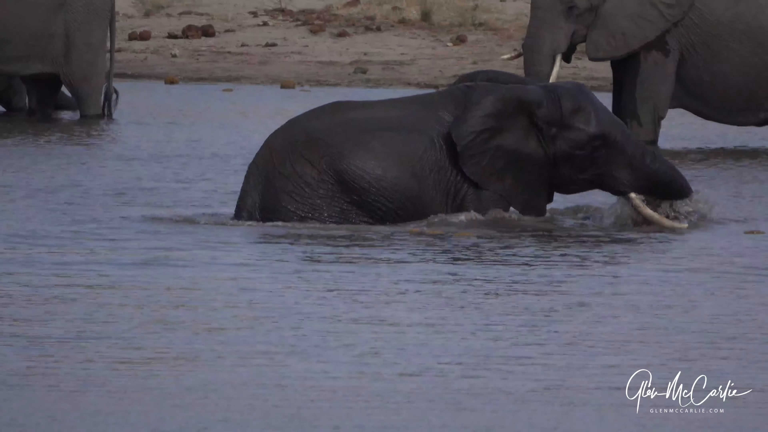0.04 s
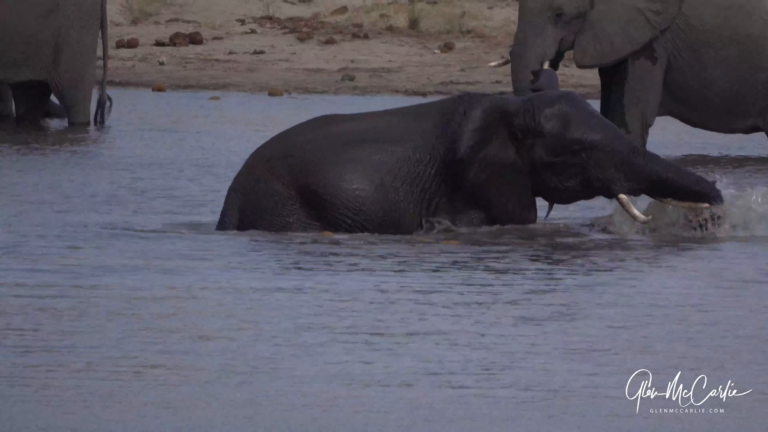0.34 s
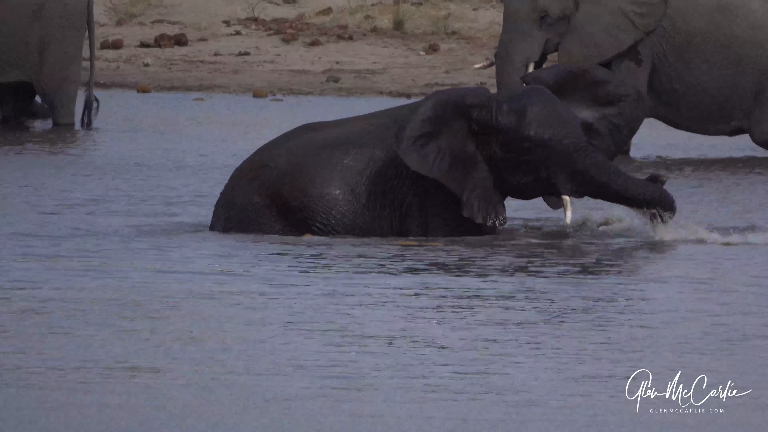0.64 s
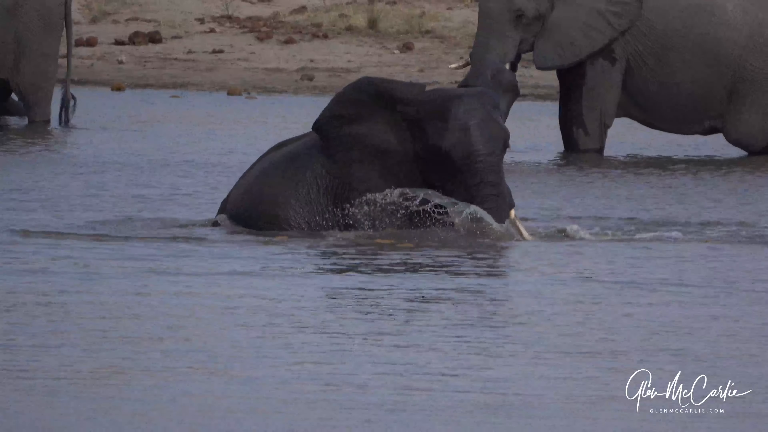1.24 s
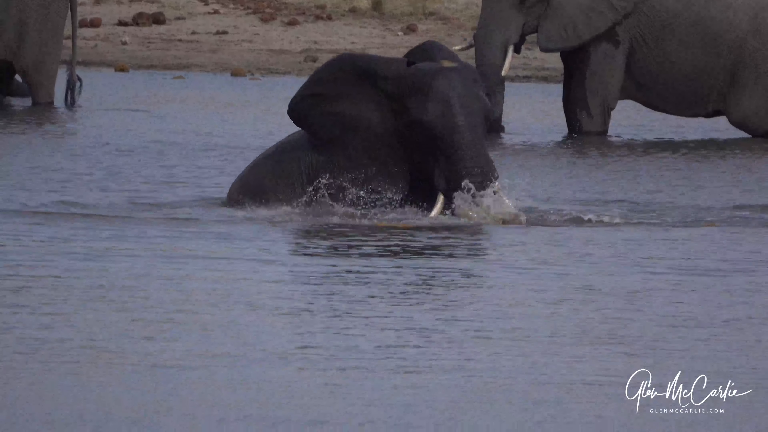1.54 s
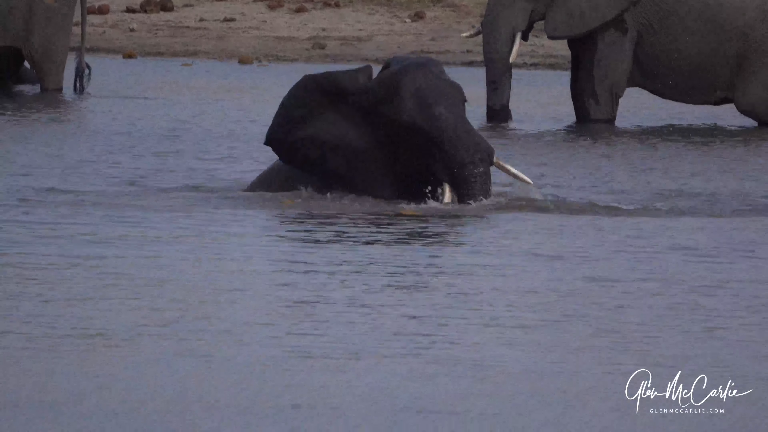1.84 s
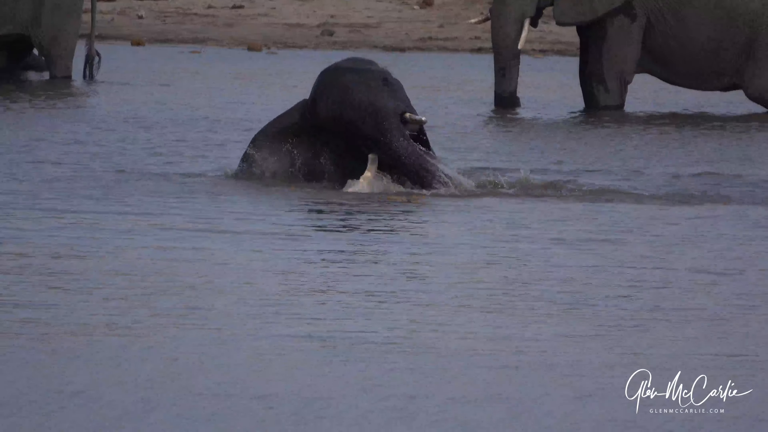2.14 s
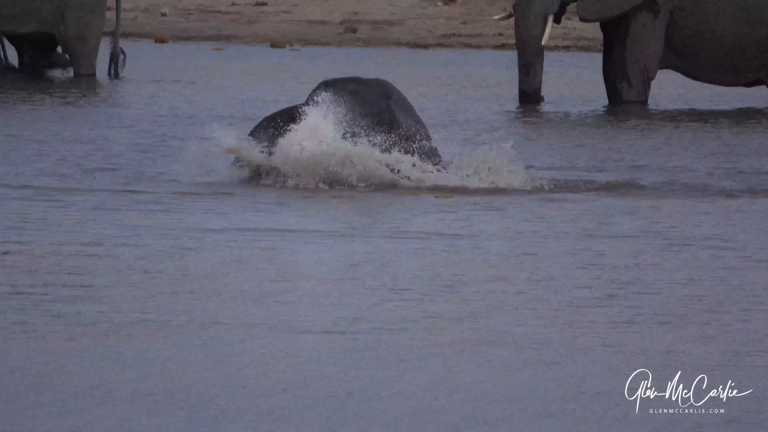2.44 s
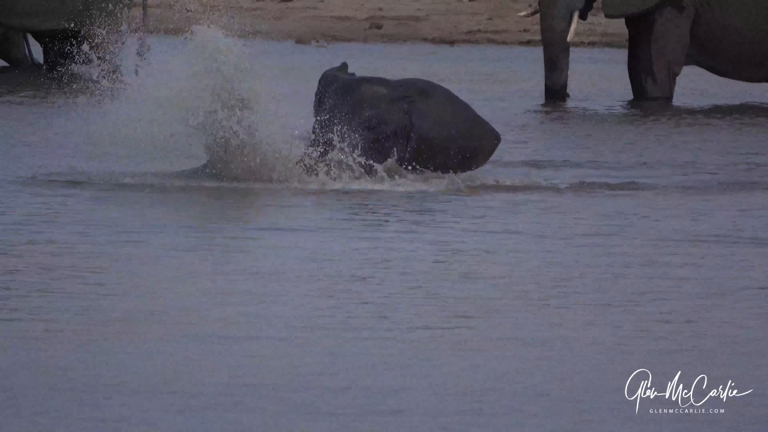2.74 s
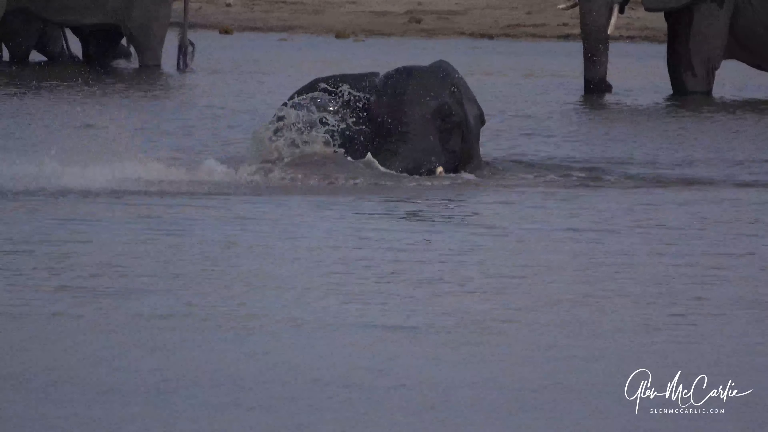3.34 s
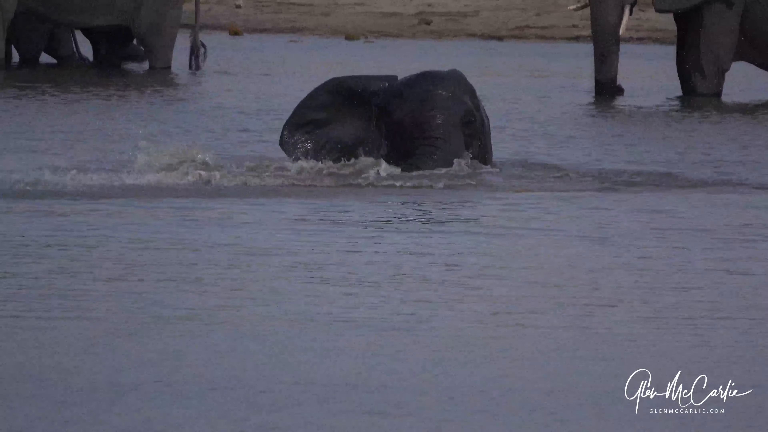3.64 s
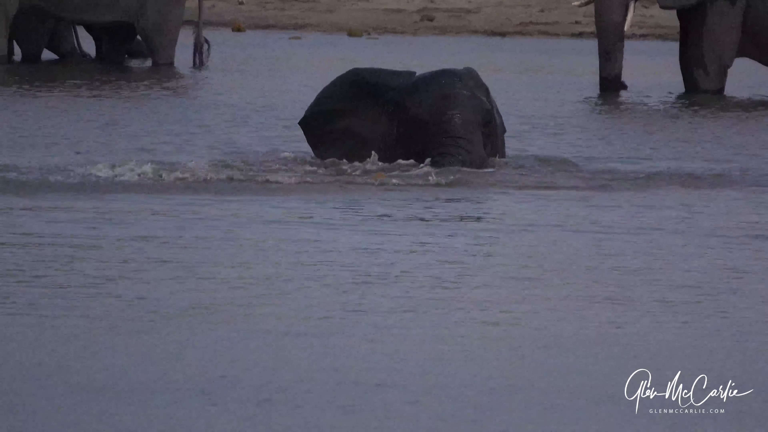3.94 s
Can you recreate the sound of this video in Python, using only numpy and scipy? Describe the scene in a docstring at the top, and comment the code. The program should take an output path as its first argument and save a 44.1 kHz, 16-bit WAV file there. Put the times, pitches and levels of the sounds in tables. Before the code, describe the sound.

Water sloshes and splashes as an elephant wallows in a waterhole.

```python
"""A waterhole, with an elephant wallowing some way off. Water churns round its body; its trunk and head
slap the surface, air pockets gulp as it plunges, and thrown spray rains back. Impacts give bursts of
noise, and trapped air rings as bubbles, the larger the lower. A small bird chatters in quick buzzy
phrases from a bush. Light wind rumbles under a faint hiss."""
import sys
import numpy as np
from scipy import signal
from scipy.fft import rfft, irfft, next_fast_len
from scipy.io import wavfile
from scipy.ndimage import uniform_filter1d, map_coordinates

SR = 44100
rng = np.random.default_rng(int(sys.argv[2]) if len(sys.argv) > 2 else 0)


def wav_out(sig):
    """Save sig, one row per channel (or a flat mono array), as 16-bit PCM at SR to the path in sys.argv[1]."""
    wavfile.write(sys.argv[1], SR, np.round(np.clip(np.atleast_2d(sig).T, -1, 1) * 32767).astype(np.int16))


N = 176400


def amp(db):
    """Amplitude ratio of a level in decibels."""
    return 10 ** (np.asarray(db) / 20)


def unit(x):
    """Normalisation to rms 1."""
    return x / np.sqrt(np.mean(x ** 2) + 1e-20)


def decay(t, t60):
    """Exponential damping: 60 dB down when t reaches t60."""
    return np.exp(-np.log(1000) * t / t60)


def along(points, hz):
    """Interpolation of (frequency_hz, value) points on a logarithmic frequency axis."""
    frequencies, values = np.transpose(points)
    return np.interp(np.log(hz + 1), np.log(frequencies + 1), values)


def curve(rows):
    """Linear interpolation of (time_s, value) points, one value a sample."""
    return np.interp(np.arange(N) / SR, *np.transpose(rows))


def wobble(rate):
    """Smooth random modulation: a spline through rate knots a second."""
    return map_coordinates(rng.standard_normal(1024), [np.arange(N) * rate / SR], mode="wrap")


def add(track, start_s, sound):
    """Superposition of a sound on a track."""
    i = max(0, round(start_s * SR))
    track[i:i + len(sound)] += sound[:max(0, N - i)]


def filtered(x, response):
    """Linear filtering: the spectrum is multiplied by a frequency response."""
    size = next_fast_len(N + SR // 2)
    return irfft(rfft(x, size) * response(np.fft.rfftfreq(size, 1 / SR)), size)[..., :N]


def coloured(x, colour):
    """Minimum-phase filtering to a spectral shape, at rms 1."""
    size = 8192
    cepstrum = irfft(np.log(amp(along(colour, np.fft.rfftfreq(size, 1 / SR)))))
    causal_fold = np.r_[1, np.full(size // 2 - 1, 2), 1, np.zeros(size // 2 - 1)]
    impulse_response = irfft(np.exp(rfft(cepstrum * causal_fold)))
    return unit(signal.fftconvolve(x, impulse_response)[:N])


def rush(colour, patchy_db):
    """Noise modulated in random patches of time and frequency."""
    spectra = signal.stft(rng.standard_normal(N), nperseg=512)[2]
    patches = uniform_filter1d(rng.standard_normal(spectra.shape), size=5, axis=0)
    patches = unit(uniform_filter1d(patches, size=6, axis=1))
    return coloured(signal.istft(spectra * amp(patchy_db * patches))[1][:N], colour)


def impacts(colour, rate, scatter_db):
    """Shot noise: drops of many sizes land at random, rate a second."""
    lands = rng.random(N) < rate / SR
    signs = rng.choice([-1, 1], N)
    sizes = amp(scatter_db * np.clip(rng.standard_normal(N), -2, 2))
    return coloured(lands * signs * sizes, colour)


def bubble(hz, cycles, rise):
    """Damped resonance of trapped air: it starts softly and rises in pitch as it dies."""
    life_s = cycles / hz
    age = np.arange(int(life_s * SR) + 2) / (life_s * SR)
    ring = np.sin(2 * np.pi * cycles * (age + rise * age * age / 2))
    onset = 1 - np.exp(-(cycles * age) ** 2)
    return ring * decay(age, 1) * onset


def bubbles(rate, centre_hz, spread, cycles, scatter_db):
    """Incoherent sum of bubble resonances, rate a second, at rms 1."""
    cloud = np.zeros(N)
    starts_s = rng.random(8000) * N / SR
    draws = np.clip(rng.standard_normal((8000, 3)), -2, 2)
    for start_s, (pitch, life, size) in zip(starts_s[:int(rate * N / SR)], draws):
        ring = bubble(centre_hz * np.exp(spread * pitch), cycles * np.exp(life / 2), rise=0.36)
        add(cloud, start_s, amp(scatter_db * size) * ring)
    return unit(cloud)


def tail(t60_s):
    """Diffuse reverberation: an impulse response of decaying noise, with energy 1."""
    t = np.arange(SR // 2) / SR
    response = rng.standard_normal(len(t)) * decay(t, t60_s)
    return response / np.linalg.norm(response)


def widened(mid, side, coherence):
    """Mid-side stereo: the lower the coherence, the more side signal parts left from right."""
    def weights(hz):
        angle = np.arccos(np.clip(along(coherence, hz), 0, 1)) / 2
        return np.array([np.cos(angle), np.sin(angle)])
    mid, side = filtered(np.array([mid, side]), weights)
    return np.array([mid + side, mid - side])


def air():
    """Steady outdoor hush: a diffuse noise field, most coherent in the bass."""
    # spectrum of the hush: frequency_hz, relative_db
    colour = [(25, -20), (60, 1), (92, -8), (118, 13), (150, 6.5), (300, -2), (540, 31), (660, 27),
              (1100, 26), (2300, 18.5), (2700, 17.5), (3050, 13), (3600, 16.5), (5500, 9), (8000, 6.5),
              (12000, 7), (15500, 5.5)]
    # likeness of left and right: frequency_hz, coherence
    coherence = [(100, 1), (1000, 0.42), (4000, 0.17), (8000, 0.38), (15000, 0.65)]
    mid, side = [coloured(noise, colour) for noise in rng.standard_normal((2, N))]
    return amp(-64) * widened(mid, side, coherence)


def wind():
    """Light gusts modulate the amplitude of a low rumble."""
    # spectrum of the rumble: frequency_hz, relative_db
    colour = [(20, 7), (45, -6), (90, -25)]
    return amp(-112 + 6 * wobble(8.7)) * coloured(rng.standard_normal(N), colour)


def far_hiss():
    """Narrow-band noise: a faint distant hiss that dies away."""
    # envelope of the hiss: time_s, level_db
    levels = [(0, -69.5), (1.0, -73), (1.7, -72), (2.0, -96)]
    # its spectrum: frequency_hz, relative_db
    colour = [(1200, -26), (1900, -5.5), (2200, 8), (2400, 8), (2650, -29), (3500, -33)]
    return amp(curve(levels)) * coloured(rng.standard_normal(N), colour)


def note(length_s, centre_hz, fall_hz):
    """Linear frequency sweep: one falling whistle under a half-sine envelope."""
    age = np.linspace(0, 1, int(length_s * SR))
    pitch_hz = centre_hz + fall_hz * (.5 - age)
    return np.sin(np.pi * age) * np.sin(2 * np.pi * np.cumsum(pitch_hz) / SR)


def bird():
    """Rapid chirps fuse into a buzz: three ticks, a swelling trill and a last tick, blurred by a bush."""
    # phrases of the song: start_s, level_db
    phrases = [(1.434, -61.5), (1.535, -57.5), (1.637, -55), (1.739, -52), (1.838, -53.5), (1.941, -54.5),
               (2.045, -62), (2.145, -65.5), (2.25, -57), (2.352, -55.5), (2.399, -62), (2.452, -57.5),
               (2.554, -62), (2.664, -59.5), (2.765, -58), (2.88, -55.5)]
    pitch_hz, fall_hz = 3690, 760
    tick_s, tick_step_s = .0032, .0047
    note_s, note_step_s, jitter_s = .0052, .0084, .0006
    # parts of a phrase: delay_s, length_s, relative_db
    ticks = [(k * tick_step_s, tick_s, -2.5) for k in range(3)]
    trill = [(.0225 + k * note_step_s, note_s, 2.2 * min(k - 3, 0)) for k in range(6)]
    closing = [(trill[-1][0] + note_step_s, tick_s, -0.5)]
    song = np.zeros(N)
    for start_s, level_db in phrases:
        for delay_s, length_s, relative_db in ticks + trill + closing:
            detune, size, late = rng.standard_normal(3)
            chirp = note(length_s, pitch_hz * (1 + .012 * detune), fall_hz * length_s / note_s)
            blurred = amp(-8) * signal.fftconvolve(chirp, tail(t60_s=.03)[:SR // 20])
            blurred[:len(chirp)] += chirp
            gain = amp(level_db + relative_db + 0.93 * size)
            add(song, start_s + delay_s + jitter_s * late, gain * blurred)
    return song + amp(-11.5) * signal.fftconvolve(song, tail(t60_s=1))[:N]


def spray():
    """Impact noise and bubble resonance: mist and droplets rain back; foam fizzes as the last land."""
    # envelope of the falling spray: time_s, level_db
    levels = [(0, -86), (.15, -87), (.4, -71.5), (.52, -65.5), (.7, -62.5), (.76, -58), (.86, -58),
              (.9, -59.5), (1.07, -60), (1.16, -68.5), (1.3, -73), (1.5, -71.5), (1.6, -74), (2.02, -70.5),
              (2.17, -76), (2.44, -65), (2.56, -72), (2.68, -74), (2.71, -65.5), (2.95, -62.5),
              (3.03, -65.5), (3.25, -63), (3.45, -58), (3.72, -54.5), (4, -63.5)]
    # its spectrum: frequency_hz, relative_db
    colour = [(500, -59), (2000, -4.5), (2500, 0.5), (3000, -5.5), (3600, 3.5), (4000, -3), (4350, 5),
              (4650, -1), (4950, 1.5), (5200, -4), (5700, -1), (6200, -7), (7200, -10.5), (7900, -20),
              (9500, -21), (11000, -40), (15500, -40)]
    # envelope of the foam's fizz: time_s, level_db
    fizz_levels = [(3.2, -100), (3.55, -78), (3.8, -70), (4, -76)]
    # its spectrum: frequency_hz, relative_db
    fizz_colour = [(4000, -30), (9000, 5), (13500, -7), (15500, -0.5)]
    mist = amp(-1) * rush(colour, patchy_db=3)
    droplets = amp(-3.5) * impacts(colour, rate=980, scatter_db=3.5)
    pings = amp(-12.5) * bubbles(rate=220, centre_hz=4400, spread=.19, cycles=52, scatter_db=9)
    fizz = amp(curve(fizz_levels)) * impacts(fizz_colour, rate=13000, scatter_db=4)
    return amp(curve(levels)) * (mist + droplets + pings) + fizz


def drips():
    """Each drip excites a small bubble resonance inside a tiny spatter of narrow-band noise."""
    # small sharp drips: start_s, level_db, pitch_hz, ping_relative_db
    drops = [(0.855, -44, 3870, -2), (1.368, -51, 4430, -5), (1.487, -50, 4060, -3), (1.513, -55, 5420, 6),
             (2.031, -54, 4600, -4), (3.763, -47, 4990, 2)]
    out, t = np.zeros(N), np.arange(SR // 20) / SR
    for start_s, level_db, pitch_hz, ping_relative_db in drops:
        add(out, start_s, amp(level_db + ping_relative_db) * bubble(pitch_hz, cycles=80, rise=0.12))
        roughness = unit(uniform_filter1d(rng.standard_normal(len(t)), size=24))
        spatter = np.exp(-t / 0.015) * roughness * np.sin(2 * np.pi * pitch_hz * t)
        add(out, start_s, amp(level_db - 8) * spatter)
    return out


def plops():
    """Free oscillation of single large bubbles, ringing out above the wash."""
    # large bubbles: start_s, level_db, pitch_hz
    large_bubbles = [(0.522, -40, 957), (0.584, -43.5, 734), (0.80, -45, 1000), (1.873, -47, 653),
                     (2.532, -43, 804), (2.543, -47, 834), (2.555, -48, 790), (3.022, -57.5, 248),
                     (3.099, -44.5, 580), (3.337, -56.5, 175), (3.399, -44, 806), (3.484, -43, 508),
                     (3.549, -38, 648)]
    out = np.zeros(N)
    for start_s, level_db, pitch_hz in large_bubbles:
        add(out, start_s, amp(level_db) * bubble(pitch_hz, cycles=40, rise=0.31))
    return out


def gulps():
    """Large air volumes resonate low: pockets collapse into clusters of deep bubbles."""
    # gulps as the body goes under: start_s, level_db, t60_s
    plunges = [(0.68, -80, 0.99), (2.80, -67, 0.67), (2.915, -57, 0.64), (3.005, -56, 0.34),
               (3.275, -49.5, 0.29), (3.315, -51.5, 0.42), (3.52, -52, 0.2), (3.68, -67, 0.78)]
    # spectrum of their noise: frequency_hz, relative_db
    colour = [(50, -20), (110, -22), (175, -7), (220, -3.5), (275, 2.5), (330, -4), (400, -5), (500, -22),
              (1000, -75)]
    rise_s = .022
    swell, t = np.zeros(N), np.arange(SR) / SR
    for start_s, level_db, t60_s in plunges:
        add(swell, start_s, amp(level_db) * (1 - np.exp(-t / rise_s)) * decay(t, t60_s))
    pockets = bubbles(rate=250, centre_hz=222, spread=.27, cycles=12, scatter_db=1.5)
    return swell * (rush(colour, patchy_db=1.0) + pockets / 2) / 2


def slaps():
    """Impact on water: trunk and head trap air that pops, and raise a burst of lumpy splatter."""
    # blows on the surface: start_s, splatter_db, pop_db, pop_pitch_hz, splatter_t60_s
    blows = [(0.008, -55, -36, 1110, 0.058), (0.206, -53.5, -38, 1210, 0.18),
             (0.219, -58, -43, 1600, 0.072), (0.498, -44, -27.5, 1140, 0.096), (0.516, -54, -45, 1190, .06),
             (0.529, -51, -27.5, 975, 0.09), (0.773, -39.5, -46, 1200, 0.037),
             (0.969, -59, -32.5, 1170, 0.11), (1.365, -56, -47, 1170, 0.18), (1.688, -57, -46, 910, .06),
             (1.805, -54, -34, 693, 0.036), (2.531, -57, -45, 1100, 0.059), (2.693, -50, -41, 1250, .04),
             (2.704, -47, -38, 1170, .12), (2.715, -62, -25.5, 1120, .2), (2.799, -44, -21.5, 1620, 0.027),
             (2.81, -60, -27, 1440, 0.043), (2.932, -44.5, -43, 1220, 0.094), (3.284, -51, -50, 1280, 0.11),
             (3.476, -40.5, -27, 1310, 0.03), (3.541, -46.5, -30, 1560, 0.035), (3.56, -88, -31, 1150, .03),
             (3.595, -47, -42, 1070, 0.2), (3.702, -78, -38, 1280, 0.45), (3.779, -53, -29, 1100, 0.15),
             (3.948, -58, -31, 1100, 0.026)]
    # spectrum of the splatter: frequency_hz, relative_db
    colour = [(100, -55), (350, -13), (550, -12.5), (800, 2.5), (1140, -8), (1420, 3.5), (1680, 1),
              (2050, -6.5), (2400, -5), (2850, -24.5), (4200, -17), (6000, -30), (9000, -41)]
    pops, bursts, t = np.zeros(N), np.zeros(N), np.arange(SR // 3) / SR
    for start_s, splatter_db, pop_db, pop_pitch_hz, splatter_t60_s in blows:
        add(pops, start_s, amp(pop_db) * bubble(pop_pitch_hz, cycles=11.3, rise=0.25))
        add(bursts, start_s, amp(splatter_db) * decay(t, splatter_t60_s))
    splatter = bursts * unit(rng.standard_normal(N) * amp(0.88 * wobble(500)))
    return pops + splatter.std() * coloured(splatter, colour)


def churn():
    """Wash, falling lumps of water and resonating bubbles share one envelope: the animal's effort."""
    # how hard the water churns: time_s, level_db
    effort = [(0.0, -61.5), (0.15, -59.5), (0.22, -57), (0.33, -56.5), (0.48, -55.5), (0.505, -50),
              (0.54, -51), (0.56, -53), (0.8, -50), (0.85, -52), (0.99, -50), (1.24, -60.5), (1.5, -60),
              (1.6, -56.5), (1.78, -60), (1.8, -52), (1.97, -57.5), (2.38, -55), (2.49, -58), (2.54, -54.5),
              (2.62, -58), (2.67, -54), (2.71, -47), (2.77, -47.5), (2.81, -46.5), (2.84, -48),
              (2.99, -47.5), (3.03, -55), (3.1, -51.5), (3.21, -50), (3.25, -58.5), (3.3, -49.5),
              (3.53, -43.5), (3.55, -43.5), (3.58, -45), (3.61, -43.5), (3.69, -46.5), (3.71, -43.5),
              (3.87, -46), (4.0, -52)]
    # spectrum of the churning: frequency_hz, relative_db
    colour = [(60, -47), (110, -47), (180, -28), (280, -20.5), (380, -22), (530, -7), (680, -8),
              (800, -2.5), (950, -3.5), (1140, 3.5), (1420, -5), (1680, 1), (2050, -11.5), (2350, -11.5),
              (2650, -21.5), (3000, -20.5), (3600, -23), (4200, -26.5), (6000, -35.5), (9000, -94)]
    # thin thrown sheets are bright, heavy heaving is dull: time_s, treble_gain_db
    brightness = [(0, 4.5), (.23, 1.5), (.38, 0), (.8, 0.5), (1.3, -0.5), (1.65, -7.5), (1.85, -3),
                  (2.2, 1), (2.4, 1.5), (2.76, 1.5), (2.9, -3), (3.2, -4.5), (3.5, 0), (3.9, 1.5)]
    heave_hz, sheet_hz, gurgle_db = 800, 1370, .7
    wash = amp(-3) * rush(colour, patchy_db=0.5)
    patter = amp(-6) * impacts(colour, rate=500, scatter_db=3.5)
    cloud = amp(-11.5) * bubbles(rate=600, centre_hz=1199, spread=0.3124, cycles=31.4, scatter_db=5.0)
    water = wash + patter + cloud
    heave = filtered(water, lambda hz: 1 / (1 + (hz / heave_hz) ** 6))
    sheets = filtered(water, lambda hz: 1 - 1 / (1 + (hz / sheet_hz) ** 8))
    treble_db = curve(brightness)
    tilted = water + (amp(treble_db) - 1) * sheets + (amp(-treble_db / 2) - 1) * heave
    return amp(curve(effort) + gurgle_db * wobble(35)) * tilted


def scene():
    """Level and phase differences set water and bird a little left; the bank reflects them faintly."""
    # level difference between the microphones: frequency_hz, left_minus_right_db
    lean = [(150, 0), (300, -.5), (450, -2), (740, .8), (1150, 4.8), (1500, 1.8), (2000, -2.8), (3300, 0),
            (5500, 1)]
    # phase difference: frequency_hz, left_lead_rad
    lead = [(0, -0.032), (2500, -0.15), (2930, 1), (4220, 0.11), (6000, 0.62), (13900, 0.04)]
    # likeness of left and right: frequency_hz, coherence
    coherence = [(100, 1), (300, 0.92), (1100, 1), (2200, 0.72), (4000, 1), (8000, 0.91), (15000, 1)]
    low_cut = signal.butter(N=6, Wn=143, btype="high", fs=SR, output="sos")
    direct = signal.sosfilt(low_cut, churn() + spray() + slaps() + plops() + drips() + gulps() + bird())
    bank = amp(-12) * signal.fftconvolve(direct, tail(t60_s=0.25))[:N]
    side = signal.fftconvolve(direct, tail(t60_s=0.12))[:N]
    pair = widened(direct + bank, side, coherence)
    share = np.array([[.5], [-.5]])  # each channel takes half of the difference
    placed = filtered(pair, lambda hz: amp(share * along(lean, hz)) * np.exp(1j * share * along(lead, hz)))
    return placed + air() + wind() + far_hiss()


def record(dry):
    """Band limiting: an ideal low-pass filter removes the highest treble."""
    return filtered(dry, lambda hz: hz < 15750)


dry = scene()
out = record(dry)
wav_out(out)
```